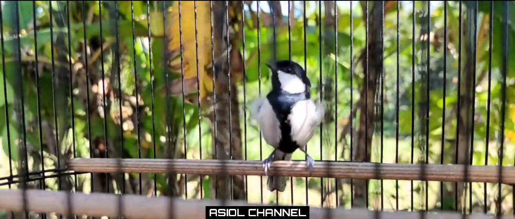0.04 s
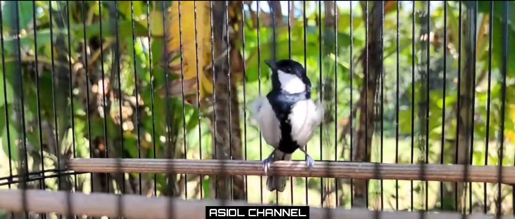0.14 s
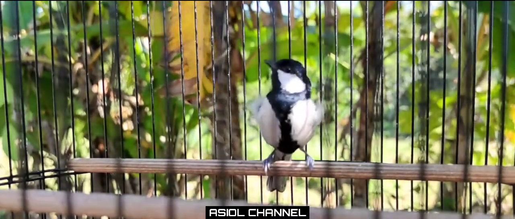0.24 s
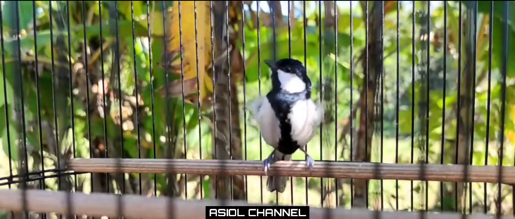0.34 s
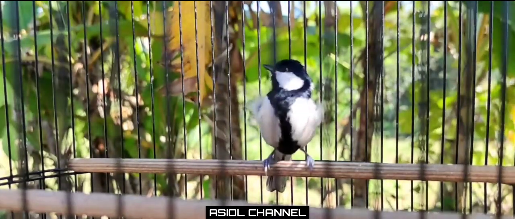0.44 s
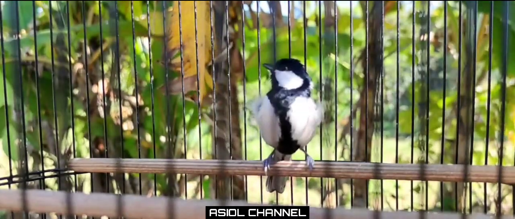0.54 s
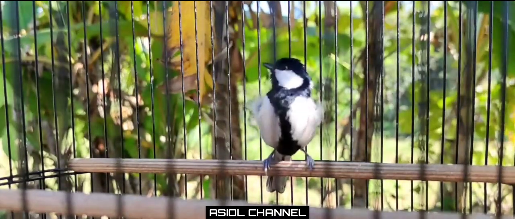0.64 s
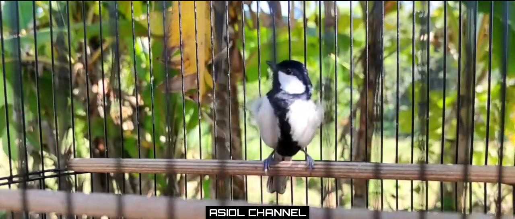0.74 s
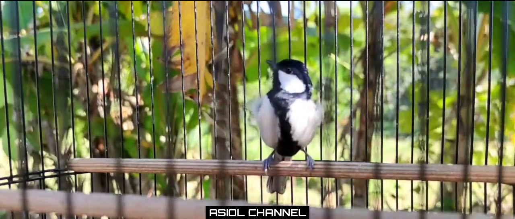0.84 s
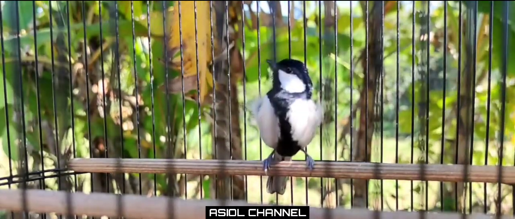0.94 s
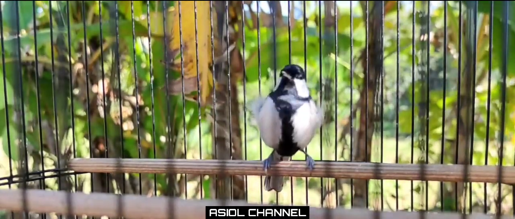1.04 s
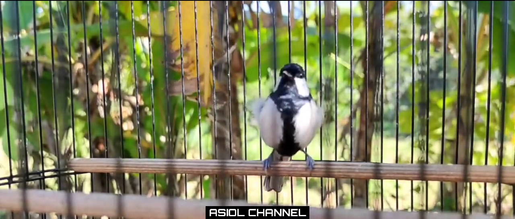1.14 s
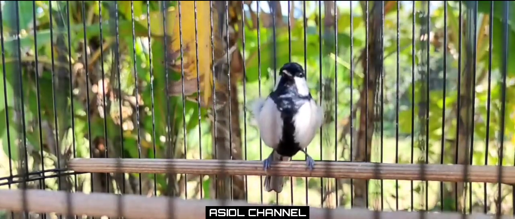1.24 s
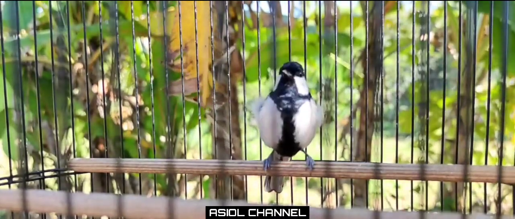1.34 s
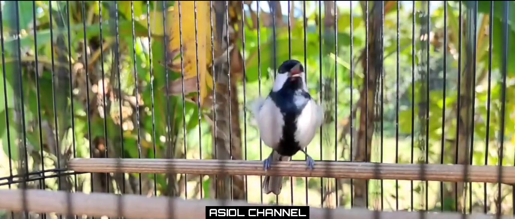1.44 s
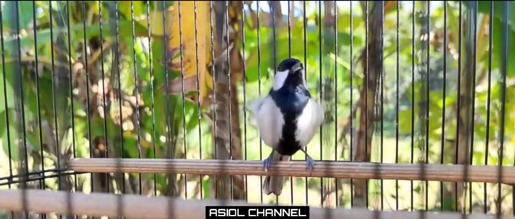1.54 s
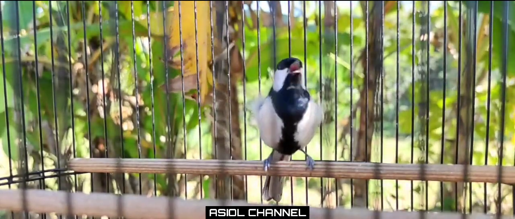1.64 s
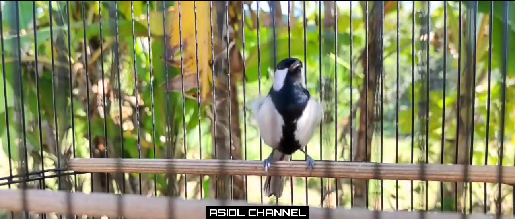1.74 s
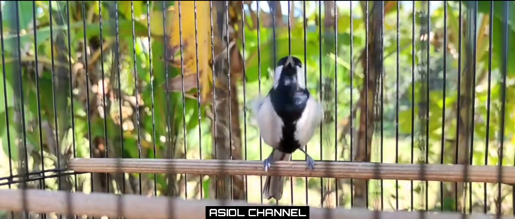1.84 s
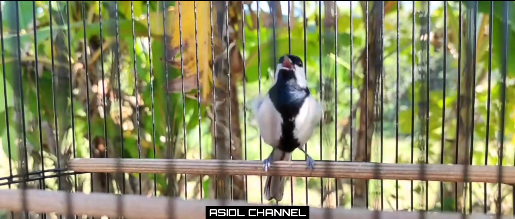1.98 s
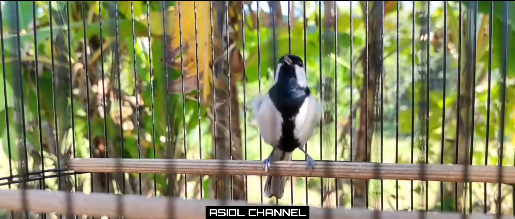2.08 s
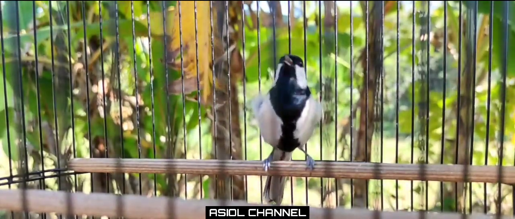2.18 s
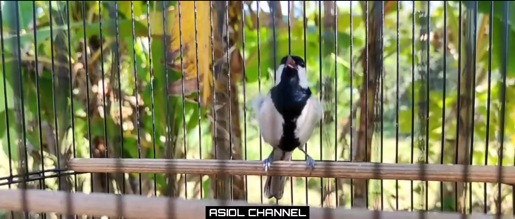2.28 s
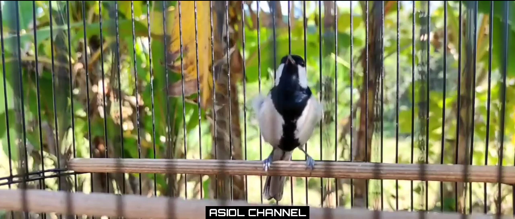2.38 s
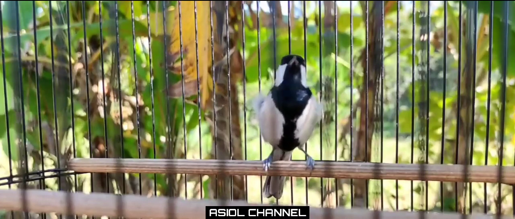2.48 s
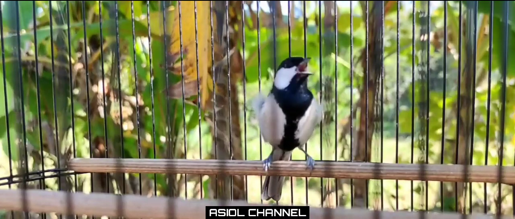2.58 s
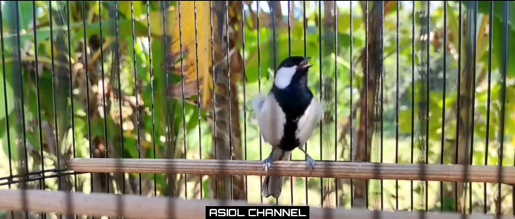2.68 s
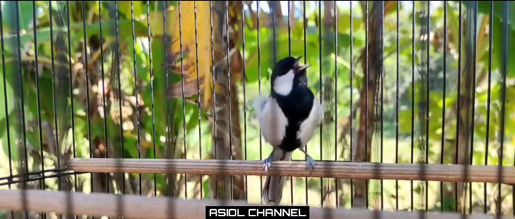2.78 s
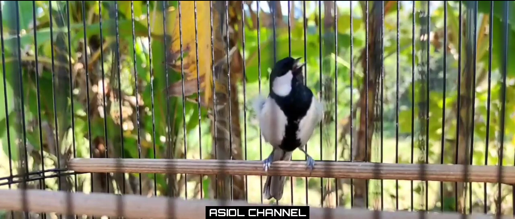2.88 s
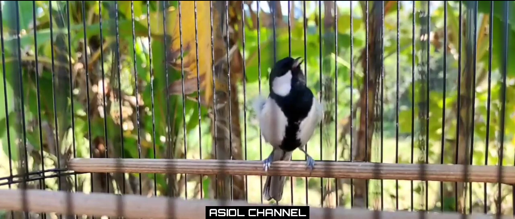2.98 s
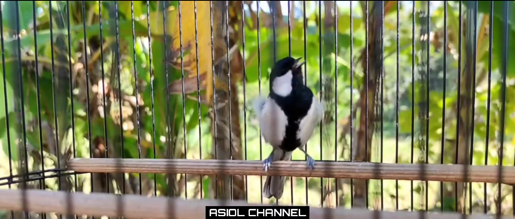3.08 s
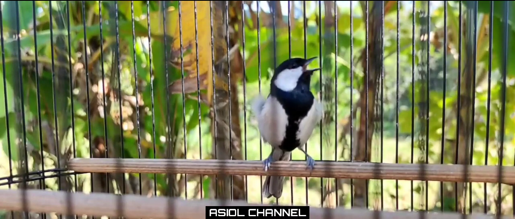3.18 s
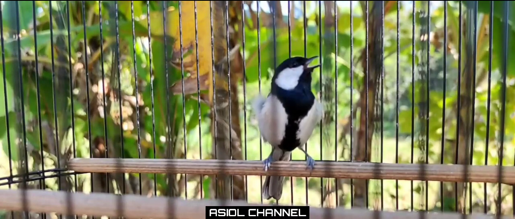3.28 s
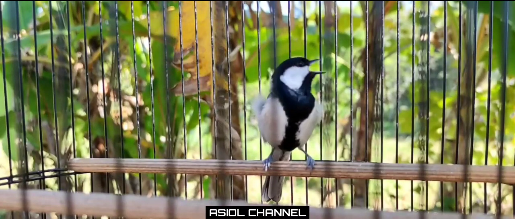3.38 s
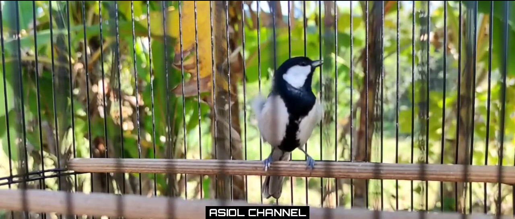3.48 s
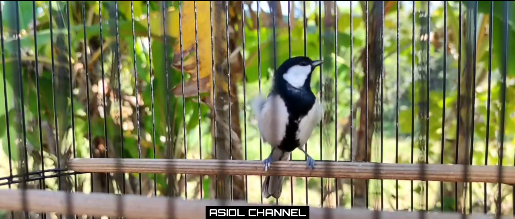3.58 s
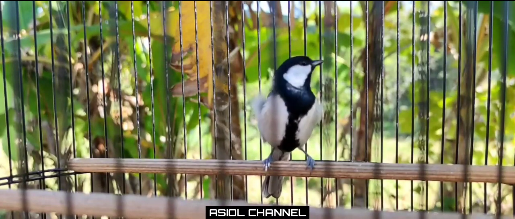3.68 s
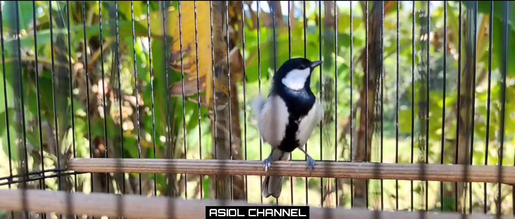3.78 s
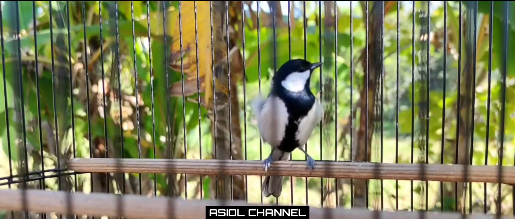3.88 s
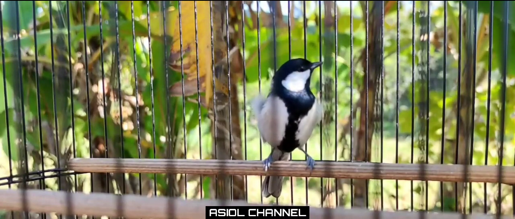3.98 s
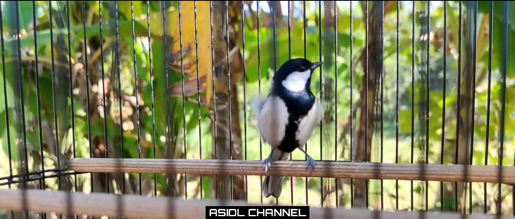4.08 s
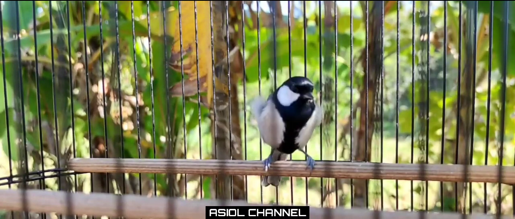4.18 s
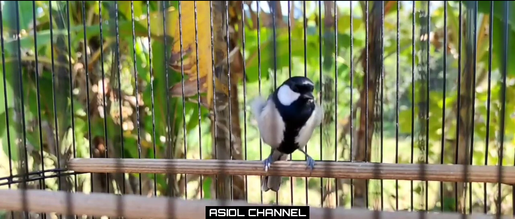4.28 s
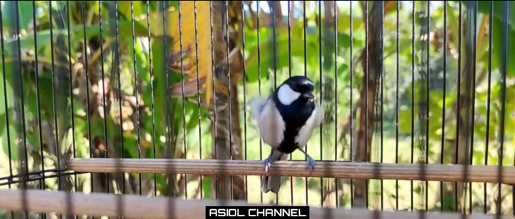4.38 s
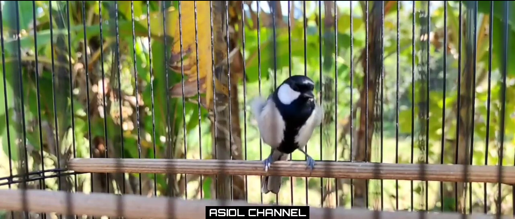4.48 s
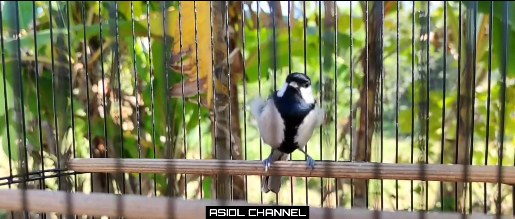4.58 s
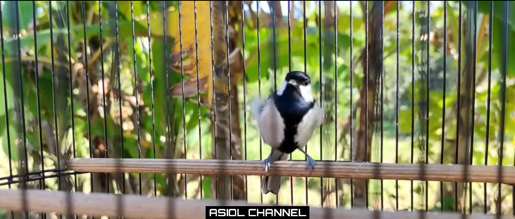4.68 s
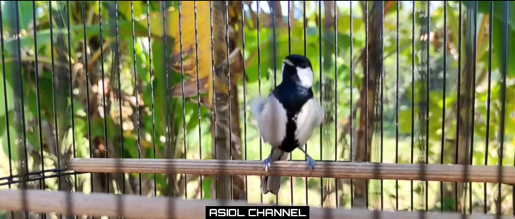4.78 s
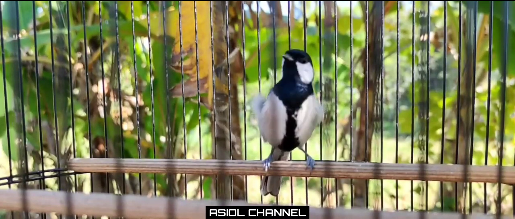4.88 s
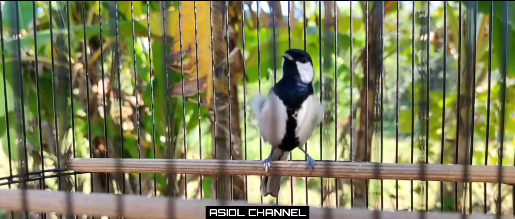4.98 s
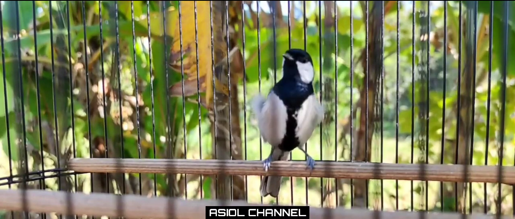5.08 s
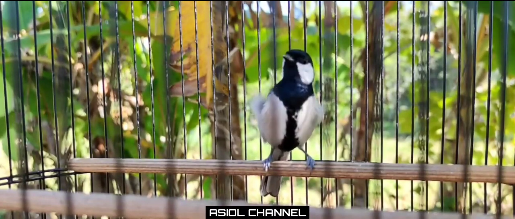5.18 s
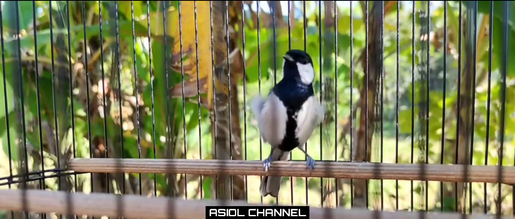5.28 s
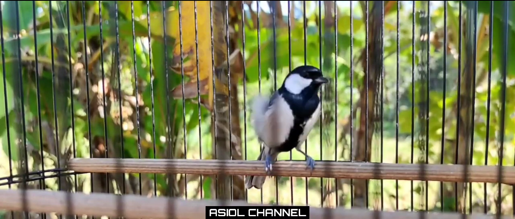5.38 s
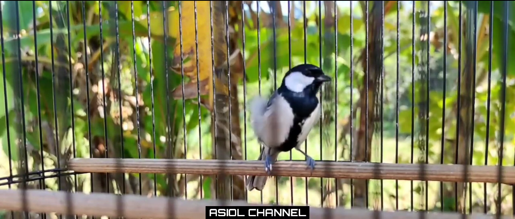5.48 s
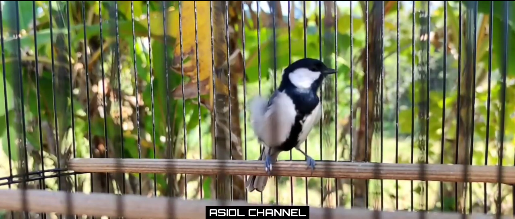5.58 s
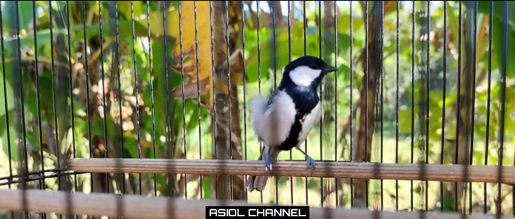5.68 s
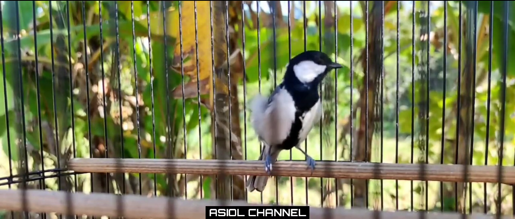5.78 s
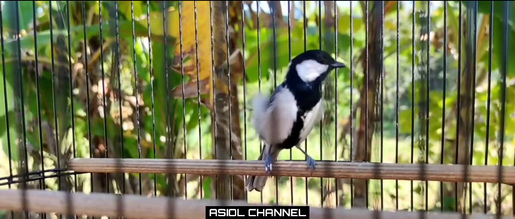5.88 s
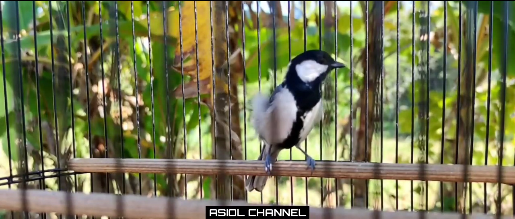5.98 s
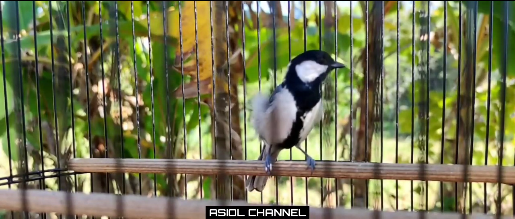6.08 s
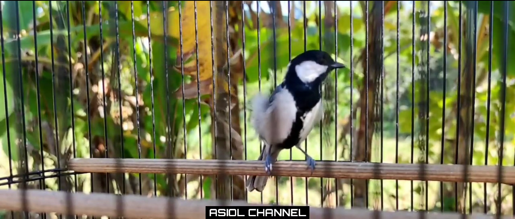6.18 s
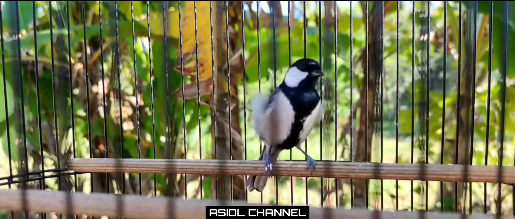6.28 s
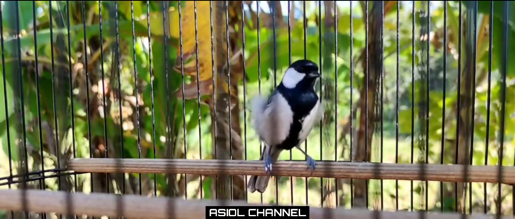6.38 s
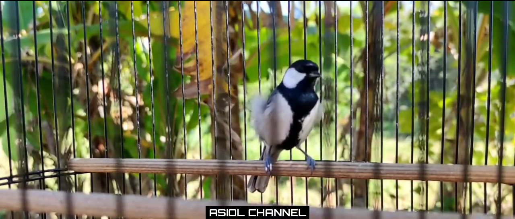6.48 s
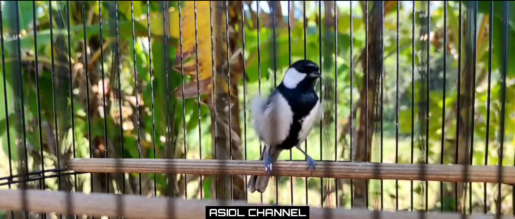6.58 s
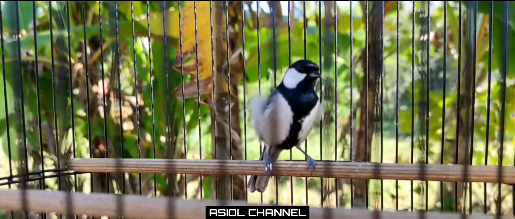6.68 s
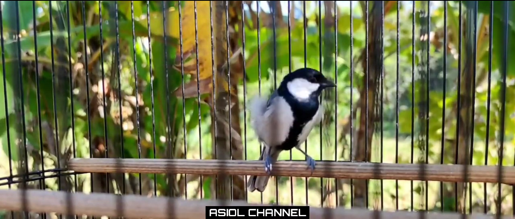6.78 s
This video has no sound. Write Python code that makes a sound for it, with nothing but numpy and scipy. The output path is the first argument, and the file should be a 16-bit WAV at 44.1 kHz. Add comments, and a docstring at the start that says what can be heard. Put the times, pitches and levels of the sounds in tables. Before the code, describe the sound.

A small engine putters softly and low outdoors, with distant traffic and thin hiss. After about a second and a half, a close caged bird sings one loud two-second bout of clear whistles, cycling quickly through high, middle and low gliding notes with slight yard echoes. The engine then fades away; faint insect trills, tiny knocks, far chirps and light feather rustles remain.

```python
"""A single-cylinder engine putters from the start and fades into a rumble of far traffic, under a thin hiss.
An insect trills faintly now and then: noise through a narrow band. A few soft knocks ring short-lived resonances.
After a second and a half a caged tit close by sings one bout of high, middle and low whistles in turn: a gliding
near sine with weak overtones and puffs of air, followed by echoes from the yard.
Later, other birds chirp far off as blurred tones, and the caged bird rustles: short bursts of filtered noise."""
import sys
import numpy as np
from scipy import signal
from scipy.fft import rfft, irfft
from scipy.io import wavfile
from scipy.ndimage import uniform_filter1d, minimum_filter1d

SR = 44100
rng = np.random.default_rng(int(sys.argv[2]) if len(sys.argv) > 2 else 0)


def bounce(signal):
    """Save signal as a 16-bit WAV file at the path given by the first command-line argument."""
    frames = np.transpose(np.atleast_2d(signal))
    limited = np.clip(frames, -1, 1)
    pcm = np.round(limited * 32767).astype(np.int16)
    wavfile.write(sys.argv[1], SR, pcm)


N = 301644
T = np.arange(N) / SR   # time in seconds

# The four kinds of syllable that the song is built from, before each note's own stretch and shift.
# Each holds: glide (turning points: seconds after the onset, pitch in Hz), attack, swell and release times
# in seconds, and the level in dB of the air noise as the syrinx (voice organ) opens, holds and closes.
OPENING = dict(glide=[(0, 6790), (.012, 7330), (.030, 6130), (.036, 5964), (.054, 7000), (.062, 6800),
           (.072, 5984)],
           attack_s=.004, swell_s=.05, release_s=0.023, open_air_db=-54.5, hold_air_db=-56.5, close_air_db=-45)
HIGH = dict(glide=[(-.002, 6334), (.006, 6585), (.016, 8100), (.021, 7600), (.026, 6394), (.031, 5920),
        (.041, 5855), (.060, 7160), (.075, 5950)],
        attack_s=.006, swell_s=.03, release_s=.013, open_air_db=-62, hold_air_db=-59, close_air_db=-42)
MIDDLE = dict(glide=[(0, 1377), (.009, 2007), (.023, 4650), (.038, 5190), (.064, 3830), (.078, 3700),
          (.098, 4270), (.136, 5820), (.160, 7198)],
          attack_s=0.037, swell_s=0.024, release_s=.03, open_air_db=-27.5, hold_air_db=-49, close_air_db=-42)
LOW = dict(glide=[(-.005, 2750), (.003, 2980), (.018, 3558), (.028, 3297), (.038, 2834), (.049, 2600),
       (.080, 3470), (.114, 4103), (.124, 5637)],
       attack_s=0.021, swell_s=.015, release_s=0.012, open_air_db=-50.5, hold_air_db=-55, close_air_db=-38)


def from_db(db):
    """Turn decibels into a gain."""
    return 10 ** (np.asarray(db) / 20)


def rms_one(x):
    """Scale a sound to an average power of one."""
    return x / np.sqrt(np.mean(np.abs(x) ** 2) + 1e-20)


def curve(rows, t=T):
    """Join each column of a table by straight lines in time."""
    seconds, *columns = np.transpose(rows)
    return [np.interp(t, seconds, column) for column in columns]


def at_hz(points, hz):
    """Read the gain of a spectrum at the given frequencies, with straight lines in dB over log frequency."""
    f, db = np.transpose(points)
    return from_db(np.interp(np.log(np.maximum(hz, 1)), np.log(f), db))


def noise(spectrum):
    """Steady noise of a given colour, with power one: white noise reshaped in frequency."""
    hz = np.arange(N // 2 + 1) * SR / N
    white = rfft(rng.standard_normal(N))
    return rms_one(irfft(white * at_hz(spectrum, hz), N))


def drift(rate_hz):
    """Random wander of spread one, mostly slower than the given rate: strongly smoothed noise."""
    hz = np.arange(N // 2 + 1) * SR / N
    white = rfft(rng.standard_normal(N))
    return rms_one(irfft(white / (1 + (hz / rate_hz) ** 2), N))


def resonate(x, modes):
    """Let several resonances ring side by side; the wider one is, the sooner it dies away."""
    out = 0
    for hz, width, db in modes:
        r = np.exp(-np.pi * width / SR)
        feedback = [1, -2 * r * np.cos(2 * np.pi * hz / SR), r * r]
        # the tiny offset avoids slow arithmetic in silence
        ringing = signal.lfilter([1, 0, -1], feedback, x + 1e-18)
        out = out + from_db(db) * (1 - r * r) / 2 * ringing
    return out


def gate(start, end, edge):
    """Open between two times, with sloping edges that are halfway at those times."""
    return np.clip(np.minimum(T - start, end - T) / edge + .5, 0, 1)


def phase_of(hz):
    """Add up the pitch of an oscillator into its running phase."""
    return 2 * np.pi * np.cumsum(hz) / SR


def engine(gain_db=1.0, uneven_db=1.5, puff_db=-10, ring_db=2.0, swing_s=0.0013, blur_db=-4.0):
    """Each firing sends a down-up pressure swing and a puff of gas, and rings the exhaust."""
    # Each row: time in seconds, firings per second.
    firing_rate = [(0, 30.45), (1.1, 30.8), (2.2, 30.7), (3.3, 30.2), (5.2, 29.9), (6.84, 29.5)]
    # The engine recedes. Each row: time in seconds, level in dB before gain_db.
    engine_level = [(0, -41.5), (1.4, -46), (2.05, -44.5), (2.3, -48.5), (3.7, -50), (4.2, -51.5),
                    (4.7, -53), (5.6, -65.5), (6.84, -61.5)]
    # Resonances of the exhaust. Each row: frequency in Hz, width in Hz, relative level in dB.
    exhaust = [(62.3, 25, -6), (134.1, 58, 4.5), (231.3, 110, -4.5), (510, 43, 2.5)]
    rate = curve(firing_rate)[0]
    turns = np.cumsum(rate) / SR + .22
    firing = turns.astype(int)
    # every firing gets its own timing error and strength
    chance = rng.standard_normal((firing[-1] + 1, 2))
    late_s = .0003 * chance[firing, 0]
    strength = from_db(uneven_db * chance[firing, 1])
    since = (turns % 1 - .5) / rate - late_s
    swing = strength * since * np.exp(-(since / swing_s) ** 2 / 2)
    puff_level = strength * (since > -swing_s) * np.exp(-np.abs(since) / .007)
    puffs = puff_level * rng.standard_normal(N)
    putter = rms_one(swing) + from_db(ring_db) * rms_one(resonate(swing, exhaust))
    putter = signal.sosfilt(signal.butter(1, 95, "high", fs=SR, output="sos"), putter)
    # shifting reflections smear the pulses into a hum whose partials swell and sink on their own
    hum = 0
    for k in range(4, 9):
        hum = hum + drift(1.5) * np.sin(2 * np.pi * (k * turns + rng.random())) / k
    putter = rms_one(rms_one(putter) + from_db(blur_db) * rms_one(hum))
    # the gas noise passes two resonances in a row
    gas = resonate(resonate(puffs, [(460.0, 440, 0)]), [(470, 183.3, 0)])
    putter += from_db(puff_db) * rms_one(gas)
    return from_db(curve(engine_level)[0] + gain_db) * putter


def ambience(traffic_db=3.5, swell_db=1.0, hiss_db=-77):
    """Far traffic, a slowly swelling low noise, lies under a thin, even hiss."""
    # Each row: time in seconds, traffic level in dB before traffic_db and the random swell.
    traffic_level = [(0, -46), (1.5, -47.5), (4, -51.5), (6.84, -53)]
    # Colours of the traffic and the hiss. Each row: frequency in Hz, relative level in dB per Hz.
    traffic_colour = [(12, 9.5), (30, -3), (60, 4.5), (100, -9), (220, -6.5), (300, -7.5), (400, -10),
                      (530, -8), (750, -18), (1100, -24.5), (2000, -34.5), (4000, -41), (9000, -51.5)]
    hiss_colour = [(1000, -2.5), (4000, 3.5), (7000, 5), (9000, 0), (14000, -18.5)]
    level = from_db(curve(traffic_level)[0] + traffic_db + swell_db * drift(5.5))
    return level * noise(traffic_colour) + from_db(hiss_db) * noise(hiss_colour)


def insect(hz=6580, width_hz=330, swell_db=9):
    """A narrow, buzzing trill, noise through a sharp resonance twice, grows and breaks off."""
    # Each row: start in seconds, end in seconds, final level in dB.
    trills = [(-.4, 0.272, -72.5), (0.99, 1.592, -73.5), (3.602, 4.197, -72.5), (4.952, 5.513, -72.5),
              (6.2, 6.904, -72)]
    level = 0
    for start, end, db in trills:
        still_to_grow = np.clip((end - T) / (end - start), 0, 1)
        level = level + gate(start, end, .03) * from_db(db - swell_db * still_to_grow)
    band = [(hz, width_hz, 0)]
    return level * rms_one(resonate(resonate(rng.standard_normal(N), band), band))


def knocks(t60=0.27):
    """Each faint knock is a burst of resonant noise that falls by 60 dB in t60 seconds."""
    # Each row: time in seconds, starting level in dB.
    hits = [(0.641, -55), (1.32, -61), (3.771, -62), (4.11, -63.5), (4.56, -59.5), (4.98, -64)]
    # What rings. Each row: frequency in Hz, width in Hz, relative level in dB.
    ringing_modes = [(1880, 330, 9), (3160, 300, 2.5), (4700, 1100, -23)]
    level = 0
    for start, db in hits:
        level = level + (T > start) * from_db(db - 60 * np.clip(T - start, 0, 1) / t60)
    return level * rms_one(resonate(rng.standard_normal(N), ringing_modes))


def syllable(t, kind):
    """One note rises, swells, holds and sinks as the syrinx opens and closes, with a puff of air at either end."""
    # The whistle is loudest where the throat passes it best. Each row: pitch in Hz, level in dB.
    throat = [(1400, -19), (2750, -14), (3300, -11.5), (3750, -6.5), (4300, -4), (5100, -6), (5900, -4),
              (6600, -4.5), (7300, -8), (8100, -9.5)]
    depth_db = 41   # a note rises from and sinks to this far down
    pressure_db = 7   # the air pressure builds by this much over the start of a note
    open_air_s, open_air_width_s = .009, .006   # first puff: time after the onset, spread
    close_air_s, close_air_width_s = .014, .0074   # last puff: time before the end, spread
    hz, = curve(kind["glide"], t)
    since, left = t - t[0], t[-1] - t
    closed_at_start = np.maximum(1 - since / kind["attack_s"], 0) ** 2
    closed_at_end = np.maximum(1 - left / kind["release_s"], 0) ** 2
    slack = np.maximum(1 - since / kind["swell_s"], 0)
    tone_db = -depth_db * (closed_at_start + closed_at_end) - pressure_db * slack
    tone = from_db(tone_db) * at_hz(throat, hz)
    opening = from_db(kind["open_air_db"]) * np.exp(-((since - open_air_s) / open_air_width_s) ** 2)
    closing = from_db(kind["close_air_db"]) * np.exp(-((left - close_air_s) / close_air_width_s) ** 2)
    return hz, tone, opening + from_db(kind["hold_air_db"]) + closing


def gestures():
    """The bird's movements set pitch, tone strength, air noise and richness in overtones through the bout."""
    # The bout. Each row: onset in seconds, kind of syllable, time stretch (ratio), pitch ratio,
    # gain in dB, change of the overtones in dB, change of the air noise in dB.
    song = [(1.577, OPENING, 1.053, 1.007, -2.5, 4.5, -2), (1.727, MIDDLE, 1, 1.027, -1.77, -1.5, -3.5),
            (1.953, LOW, 0.98, 1.0, -4, -4.5, 1.5), (2.1484, HIGH, 0.98, 1, -3.5, 6.5, -0.5),
            (2.298, MIDDLE, 1.001, 1.013, -2, -0.5, 0.5), (2.524, LOW, 1.007, 1.006, -4, -4.5, 1),
            (2.718, HIGH, 0.97, 1, -2.5, 5.5, 2), (2.869, MIDDLE, 1.027, 1.028, -3, 0.5, 3),
            (3.101, LOW, 1.002, 0.993, -5, -4, 0), (3.2915, HIGH, 1.037, 1.003, -3.3, 6.5, -8.5),
            (3.446, MIDDLE, 1.036, 1.009, -4, 0.5, -1.5)]
    pitch, tone, air, rich = np.full(N, 4000.), np.zeros(N), np.zeros(N), np.zeros(N)
    for start, kind, stretch, ratio, gain_db, overtone_db, air_db in song:
        t = (T - start) / stretch
        first, last = kind["glide"][0][0], kind["glide"][-1][0]
        on = (t >= first) & (t <= last)
        hz, note, puffs = syllable(t[on], kind)
        # the pitch is in place just before the note and stays put after it
        pitch[t >= first - .01] = hz[0] * ratio
        pitch[t > last] = hz[-1] * ratio
        pitch[on] = hz * ratio
        tone[on] = note * from_db(gain_db)
        air[on] = puffs * from_db(gain_db + air_db)
        rich[on] = from_db(overtone_db)
    # muscles round the corners of each glide
    return uniform_filter1d(pitch, size=220), uniform_filter1d(tone, size=40), uniform_filter1d(air, size=60), rich


def hoarseness(spread=0.62):
    """Narrow, wide-sounding hiss stands in for the whistle now and then; also gives its share of the power."""
    # Each row: start in seconds, end in seconds, centre in Hz, width in Hz, share of the power (0-1).
    hoarse_moments = [(1.592, 1.607, 6910, 1400, 0.9), (1.868, 1.893, 6300, 1400, 1),
                      (2.435, 2.455, 6200, 1713, 0.33), (2.903, 2.934, 4560, 942, .45),
                      (3.013, 3.022, 6500, 1500, 0.5), (3.588, 3.605, 6400, 1670, 0.35)]
    share, rasp = np.zeros(N), np.zeros((2, N))
    # noise added to one ear and subtracted from the other sounds wide
    side = rng.standard_normal(N) * np.array([[1], [-1]])
    white = rng.standard_normal(N) + spread * side
    for start, end, hz, width, part in hoarse_moments:
        near = slice(int((start - .02) * SR), int((end + .02) * SR))
        fade = np.sin(np.pi / 2 * gate(start, end, .004)[near]) ** 4
        amount = np.clip(part, 0, 1) * fade
        band = signal.butter(5, [hz - width / 2, hz + width / 2], "band", fs=SR, output="sos")
        rasp[:, near] += np.sqrt(amount / 2) * rms_one(signal.sosfilt(band, white[:, near]))
        share[near] += amount
    return rasp, np.clip(share, 0, 1)


def tit(wander=0.0022, flutter_db=0.28, jitter=0.0022, air_jitter=0.1, overtone_flicker_db=4.5,
        octave_db=5.0, throat_low_hz=2700):
    """The syrinx whistles a near sine with weak overtones; turbulent air roughens the ends of the notes."""
    # Each row: multiple of the pitch, basic level in dB.
    overtones = [(2, -43), (3, -45), (4, -51.5), (5, -58)]
    # The beak colours the overtones. Each row: frequency in Hz, gain in dB.
    beak = [(3000, 10), (6000, 3), (8000, 1.5), (10500, 2.5), (12000, -3), (13500, 4), (15000, -4)]
    # Colour of the air noise. Each row: frequency in Hz, relative level in dB per Hz.
    air_colour = [(900, -15), (1600, -9.5), (3000, -9.5), (4500, 7), (6500, 3), (8000, -6.5), (9500, -12.5),
                  (13000, -18.5), (15000, -12.5)]
    pitch, tone, air, rich = gestures()
    turbulence = np.clip(air / (np.abs(tone) + 1e-4), 0, .25)
    # the pitch wanders slowly and shakes fast, more so in rough air
    shake = (jitter + air_jitter * turbulence) * drift(600)
    phase = phase_of(pitch * (1 + wander * drift(40) + shake))
    tone = np.abs(tone) * from_db(flutter_db * drift(70))
    rasp, share = hoarseness()
    voice = tone * (np.sqrt(1 - share) * np.sin(phase) + rasp)
    # overtones swell less than the fundamental, grow with turbulence and blur as the pitch rises
    drive = rich * tone ** .6 * (1 + 6 * np.minimum(turbulence, .06))
    blur = .85 * (pitch / 6000) ** 2
    for k, db in overtones:
        strength = from_db(db + overtone_flicker_db * drift(120)) * at_hz(beak, k * pitch)
        strength = strength * (k * pitch < SR / 2)   # none above what the sample rate can hold
        voice += drive * strength * np.sin(round(k) * phase + blur * drift(330))
    # while the pitch is still below the throat resonance, the octave is what carries
    below = (turbulence / turbulence.max()) ** 3 / (1 + (pitch / throat_low_hz) ** 8)
    voice += from_db(octave_db) * tone * np.sqrt(below) * np.sin(2 * phase)
    return np.sqrt(2) * voice + air * noise(air_colour)


def first_click():
    """The first note starts with a sharp, bright tick: a single pulse with its lows removed."""
    # Time in seconds, height of the pulse in dB before the filter.
    tick = (1.580, -12)
    start, db = tick
    click = np.zeros(N)
    click[int(start * SR)] = from_db(db)
    return signal.sosfilt(signal.butter(4, 6500, "high", fs=SR, output="sos"), click)


def yard(x, near_db=-22, near_t60=0.105, far_db=-54, far_t60=0.62, wall_db=-51, wall_s=.2):
    """Sound returns as close reflections, a short scatter from cage and leaves, a faint long tail and a far wall."""
    # Close reflections from the cage. Each row: delay in seconds, polarity (1 or -1), level in dB.
    near_echoes = [(.000918, 1, -20), (.001429, -1, -21), (.001621, -1, -19)]
    t = T[:SR]
    scatter = from_db(near_db) * rms_one(from_db(-60 * t / near_t60) * (t > .002))
    tail = from_db(far_db) * rms_one(from_db(-60 * t / far_t60) * (t > .03))
    wall = from_db(wall_db) * rms_one(np.exp(-np.abs(t - wall_s) / .03))
    response = rng.standard_normal(SR) * np.sqrt((scatter ** 2 + tail ** 2 + wall ** 2) / SR)
    response[0] = 1   # the direct sound
    for delay, polarity, db in near_echoes:
        response += polarity * from_db(db) * np.sinc((t - delay) * SR)
    return signal.fftconvolve(x, response[None], axes=1)[:, :N]


def far_birds(blur_hz=110):
    """Short gliding calls are blurred by the way through the foliage: their strength and phase wander."""
    # Each row: start in seconds, length in seconds, start pitch in Hz, end pitch in Hz, level in dB.
    calls = [(4.047, .06, 4850, 4900, -67), (4.849, 0.068, 3430, 3473, -70), (5.969, .06, 6300, 6490, -68),
             (6.106, 0.076, 4480, 4620, -68), (6.497, .05, 3550, 3400, -73)]
    out = 0
    for start, length, start_hz, end_hz, db in calls:
        pitch = np.interp(T, [start, start + length], [start_hz, end_hz])
        level = from_db(db) * gate(start, start + length, 0.048)
        out = out + level * np.exp(1j * phase_of(pitch))
    return out.real * drift(blur_hz) + out.imag * drift(blur_hz)


def rustle():
    """Feathers and feet rustle briefly and faintly: short bursts of noise through one resonance each."""
    # The bird shifts on its perch.
    # Each row: start in seconds, end in seconds, centre in Hz, width in Hz, level in dB.
    shifts = [(4.80, 4.86, 4900, 501, -73.5), (5.701, 5.72, 4500, 5000, -69), (6.207, 6.24, 5910, 904, -71),
              (6.51, 6.56, 5390, 1800, -67)]
    white = rng.standard_normal(N)
    out = 0
    for start, end, hz, width, db in shifts:
        out = out + from_db(db) * gate(start, end, .015) * rms_one(resonate(white, [(hz, width, 0)]))
    return out


def scene():
    """The close bird sings in its yard; everything else sits in the middle."""
    background = engine() + ambience() + insect() + knocks()
    song = yard(tit() + first_click())
    return background + song + far_birds() + rustle()


def record(dry, cutoff_hz=14450):
    """A limiter holds the loudest peaks down; the top is cut steeply."""
    room = np.minimum(1, .92 / (np.abs(dry).max(axis=0) + 1e-9))
    gain = uniform_filter1d(minimum_filter1d(room, size=129), size=129)
    return signal.sosfilt(signal.ellip(10, .2, 80, cutoff_hz, fs=SR, output="sos"), dry * gain)


dry = scene()
out = record(dry)
bounce(out)
```